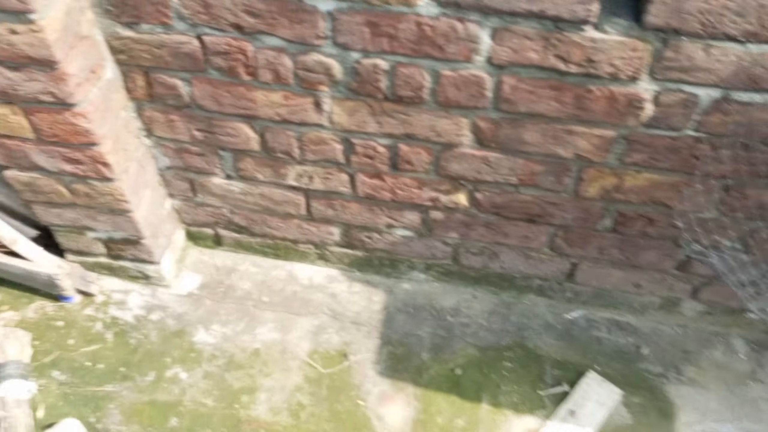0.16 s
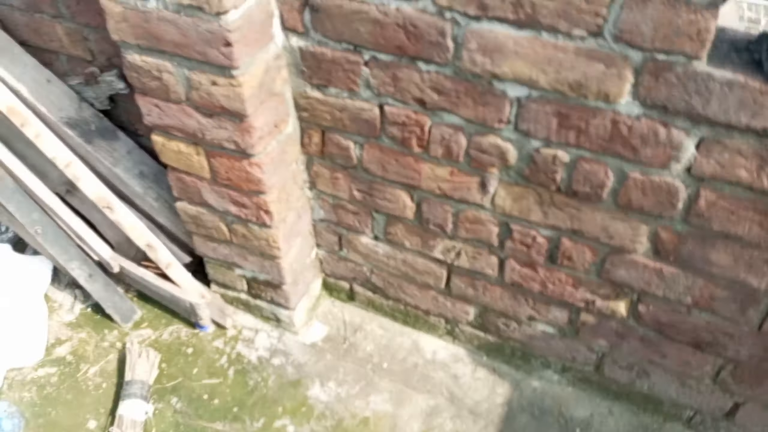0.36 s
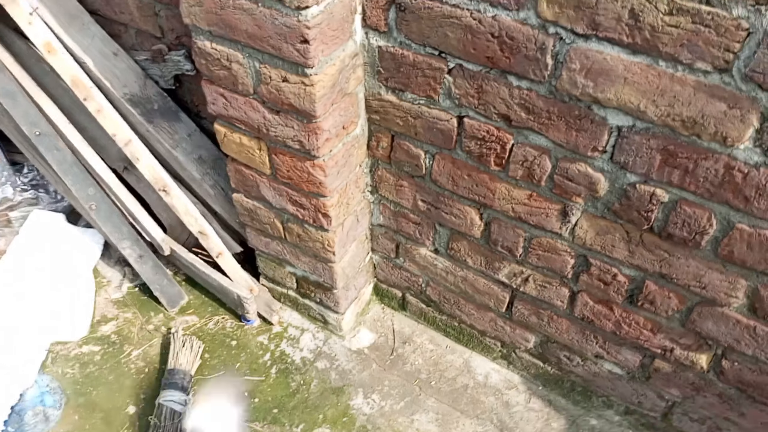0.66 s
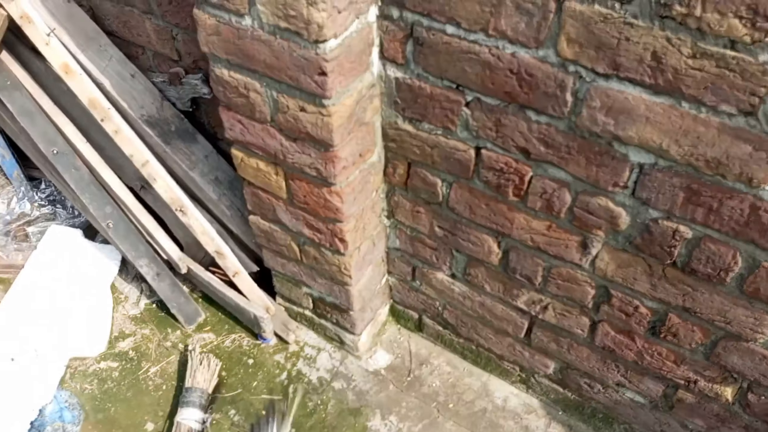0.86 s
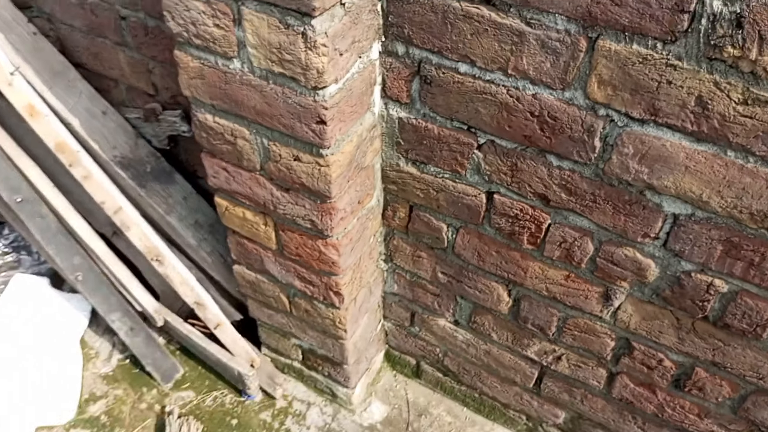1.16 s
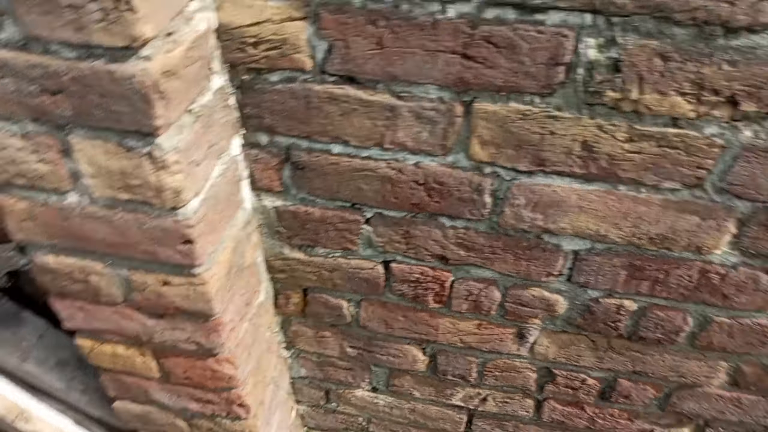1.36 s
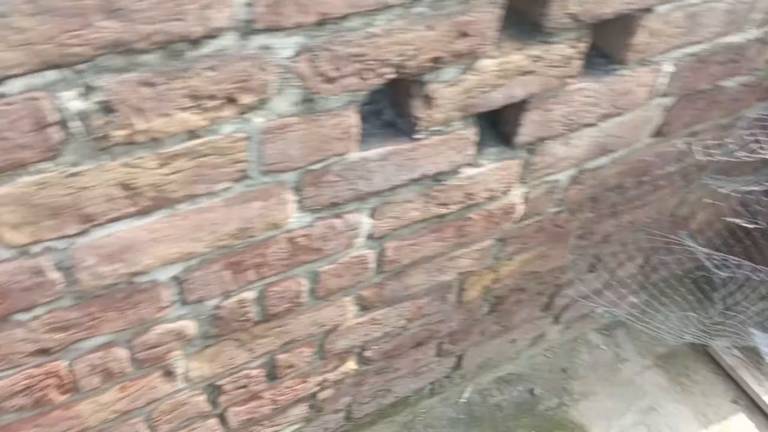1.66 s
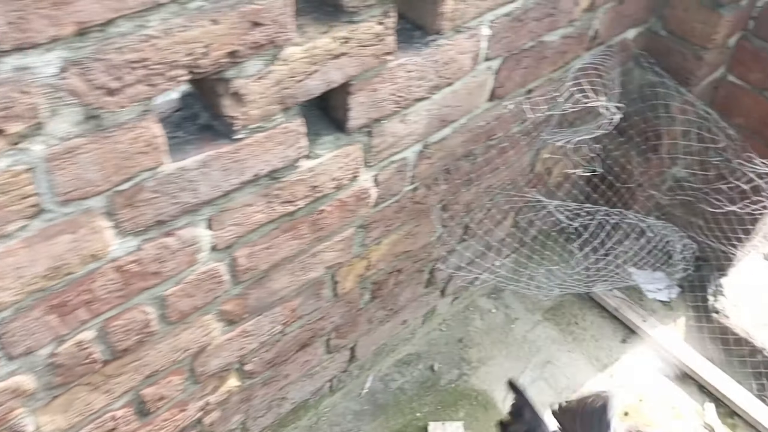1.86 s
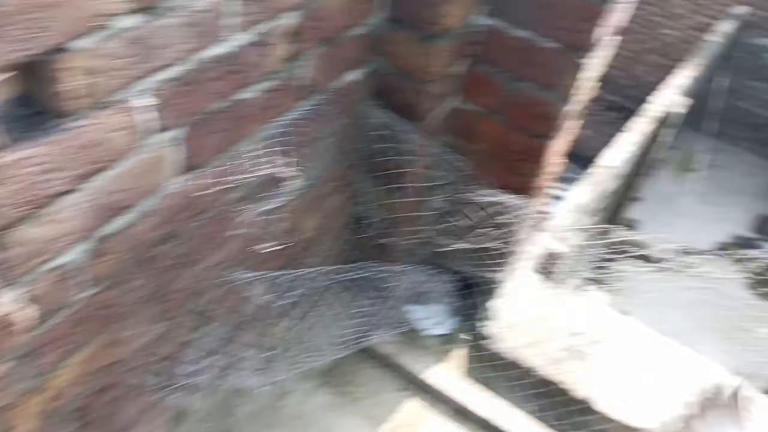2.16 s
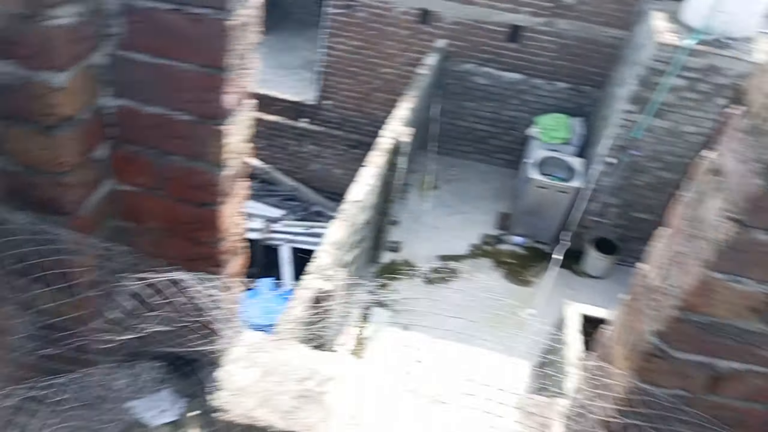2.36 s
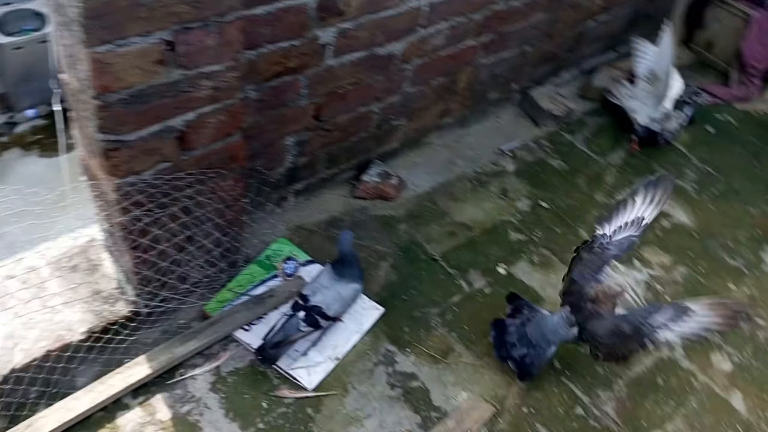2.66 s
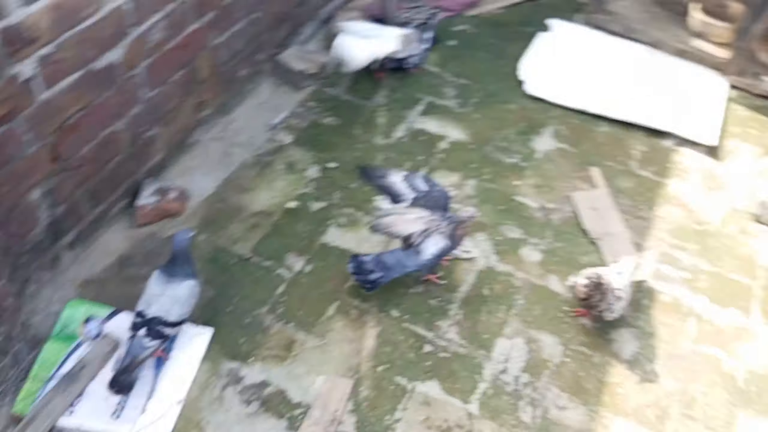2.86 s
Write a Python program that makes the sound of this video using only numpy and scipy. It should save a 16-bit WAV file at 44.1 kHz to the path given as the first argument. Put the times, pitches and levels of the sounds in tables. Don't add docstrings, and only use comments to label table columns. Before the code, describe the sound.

Pigeons scuffle on a walled rooftop: light feather swishes and claw knocks at first, with a heavy low bump near 1.0 s. Raspy two-part sparrow chirrups come at 0.4, 0.9, 1.05, 1.4 and 2.3 s, among thin falling chick peeps. Sharp phone taps click at 1.5 s. Wing slaps and grunting thumps crowd 1.75-2.4 s, then ease over town hum, a distant flock and short brick echo.

```python
import sys
import numpy as np
from scipy import signal
from scipy.io import wavfile
from scipy.ndimage import uniform_filter1d

SR = 44100
rng = np.random.default_rng(int(sys.argv[2]) if len(sys.argv) > 2 else 0)


def file_out(sig):
    cols = np.atleast_2d(sig).T
    lim = np.clip(cols, -1, 1)
    pcm = np.round(lim * 32767).astype(np.int16)
    wavfile.write(sys.argv[1], SR, pcm)


def elevation(decibels):
    levels = np.asarray(decibels, float)
    return 10 ** (levels / 20)


N = 132300
T = np.arange(N) / SR
TIP_HZ, TIP_WIDTH_HZ = 13000, 18000

# frequency in Hz, level in dB per Hz.
TOWN_COLOUR = [(40, -36), (100, -7.5), (300, 1.5), (650, -5), (2500, -4), (4600, -13.5), (6800, -35),
               (8600, -54), (15800, -48.5)]
# time in seconds, level in dB.
FLOCK_STIR = [(0, 1), (.2, -1), (.5, -4.5), (.67, 0), (.85, 4.5), (1.15, -1), (1.26, -5.5), (1.45, -1.5),
              (1.6, -2.5), (1.73, 1), (2.2, 4), (2.55, 2), (2.9, -2.5), (3, -1.5)]
# start in seconds, length in seconds, first pitch in Hz, last pitch in Hz, level in dB.
PEEPS = [(.0, 0.052, 2644, 2207, -54), (0.048, 0.083, 2317, 1985, -55), (.285, 0.1, 3880, 3607, -49.5),
         (2.779, 0.038, 2887, 2660, -50), (0.318, 0.026, 2155, 2040, -51),
         (0.498, 0.037, 3063, 2800, -45.5), (.835, 0.086, 3200, 2364, -56),
         (1.06, 0.027, 2250, 2140, -47.5), (.998, .06, 3410, 3400, -39), (0.319, .03, 4300, 4090, -55.5),
         (1.164, 0.026, 2620, 2470, -38), (1.231, 0.07, 3130, 2850, -56.5),
         (1.298, 0.091, 3248, 2523, -48.5), (1.263, 0.12, 2740, 2125, -55), (1.396, 0.032, 4150, 4010, -48),
         (1.463, 0.066, 3950, 3716, -50), (1.548, 0.045, 3030, 2770, -54.5),
         (1.596, 0.045, 2800, 2650, -49.5), (1.652, .04, 2450, 2250, -47), (2.048, 0.17, 4290, 4090, -54.5),
         (2.203, 0.056, 4100, 2950, -43.5), (2.27, 0.073, 3050, 2780, -58.5),
         (2.262, 0.067, 2600, 2578, -56.5), (2.344, 0.03, 2450, 2180, -49),
         (2.668, 0.13, 3775, 3490, -57.5), (2.718, 0.053, 4380, 3760, -60),
         (2.698, 0.081, 3015, 2245, -53.5), (2.763, 0.042, 3740, 2735, -56.5)]
# start in seconds, level in dB, centre in Hz, length in seconds.
KNOCKS = [(0.093, -51, 2160, 0.0078), (0.236, -43.5, 1970, 0.021), (0.387, -48, 1850, 0.024),
          (0.564, -41, 1710, 0.023), (0.586, -47.5, 937, 0.0088), (.726, -52, 1340, 0.01),
          (0.746, -41, 1540, 0.025), (.933, -43, 1890, 0.018), (1.01, -51, 1260, 0.013),
          (1.013, -45, 2030, 0.004), (1.086, -40, 2228, 0.0078), (1.163, -50.5, 1060, 0.009),
          (1.287, -52.5, 1300, .01), (1.314, -59, 1240, 0.02), (1.419, -48, 2300, 0.019),
          (1.431, -51, 1400, 0.0083), (1.529, -65, 14600, 0.0062), (1.764, -38.5, 1740, 0.0083),
          (1.763, -44, 3960, 0.0056), (1.766, -40.5, 1080, 0.0092), (1.828, -50, 1970, 0.014),
          (1.884, -37.5, 1006, .012), (1.885, -36, 4350, 0.0096), (1.896, -37, 3320, 0.0077),
          (1.916, -39, 2540, .008), (1.929, -40, 3100, 0.013), (1.943, -52, 2710, 0.0066),
          (1.96, -54, 3980, 0.0059), (1.969, -47.5, 1170, 0.007), (2.006, -43, 1660, 0.0075),
          (2.008, -40.5, 3130, 0.0098), (2.022, -63, 2350, 0.0037), (2.037, -65, 2970, 0.0079),
          (2.134, -44, 1790, 0.0075), (2.253, -40.5, 3150, .012), (1.12, -32, 3000, 0.0081),
          (.974, -40, 2650, .012), (2.199, -46, 1190, 0.0042), (2.255, -49, 1130, 0.0089),
          (2.383, -38, 1065, 0.0083), (2.388, -57, 3270, 0.0068), (2.389, -40, 6060, 0.0077),
          (2.413, -47, 1630, 0.013)]
# start in seconds, length in seconds, level in dB, centre in Hz, thin top hiss in dB.
SWISHES = [(0.146, 0.077, -54, 1180, -23), (0.226, 0.041, -45.5, 1850, -38),
           (0.304, 0.054, -54.5, 1580, -41), (0.525, 0.065, -46, 1700, -39), (0.701, 0.07, -46, 1620, -35),
           (0.804, 0.086, -62, 2280, -4), (0.893, 0.13, -56, 1920, -12), (0.999, 0.038, -46, 1426, -17),
           (1.315, 0.021, -49, 1460, -37), (1.414, 0.029, -55, 2050, -2), (1.858, 0.24, -53.5, 2570, 0.5),
           (2.124, 0.023, -52, 1620, -32), (2.226, 0.058, -71, 1540, -20), (2.322, 0.15, -50, 2140, 2),
           (2.412, .11, -52.5, 2050, -13), (1.084, 0.089, -57.5, 2200, -29), (1.5, 0.053, -63, 1500, 2)]
# seconds from start, pitch in Hz, level in dB, rasp 0 to 1.
CHIRRUP_FALL = [(0, 4235, -11.5, .45), (.012, 4150, -7.5, 0.6), (.028, 4150, -4.5, .9),
                (.045, 3650, -11, 0.7), (.056, 3250, 1.5, .3), (.07, 3180, 0.5, .4), (.082, 2600, 8.5, .6)]
# seconds from start, pitch in Hz, level in dB, rasp 0 to 1.
CHIRRUP_HOLD = [(.08, 4068, 10.5, 0.77), (.088, 3680, 3, 0.3), (.102, 3408, 8, 0.38), (.125, 3400, 4, 0.58),
                (.135, 3368, -11, .25), (.165, 3350, -18, .2)]
# start in seconds, level in dB, pitch factor, second part in dB, its lateness in ms.
CHIRRUPS = [
    (0.364, -35.5, 1, -5, 0.17),
    (.903, -38.5, 0.97, -2.5, 8.4),
    (1.052, -37.5, 1.01, -2.5, 2.8),
    (1.39, -40.5, 1.001, -2.5, 1.65),
    (2.329, -36, 1.0, -5, 6.75),
]
# start in seconds, peak in dB, pitch in Hz, length in seconds.
THUMPS = [
    (0.528, -49, 465, 0.017),
    (0.731, -46.5, 399, 0.023),
    (0.976, -30.5, 268.6, 0.022),
    (1.798, -43, 278, 0.02),
    (1.873, -38.5, 317, 0.04),
    (1.919, -42.5, 404, 0.035),
    (1.973, -35.5, 267, 0.01),
    (2.104, -45, 278, 0.02),
    (2.223, -40, 337, 0.017),
    (2.295, -42.5, 603, 0.0043),
]
# start in seconds, length in seconds, level in dB.
GUSTS = [
    (0.768, 0.1, -59),
    (1.364, 0.12, -63),
    (1.521, 0.036, -47.5),
    (1.842, 0.21, -54.5),
    (2.05, 0.313, -57),
    (2.407, 0.041, -59.5),
]
# time in seconds, feather crack in dB, wing in dB over crack,
# tip hiss in dB over crack, time to die by 60 dB in seconds.
SLAPS = [(0.8056, -62.5, 28.5, -23, 0.084), (1.0117, -47.5, 21, -35, 0.042),
         (1.385, -36, -20.5, -44, 0.048), (1.5287, -43.5, 2, -38, 0.14), (1.6177, -43.5, -1.5, -47, 0.048),
         (1.6621, -41, -1, -18.5, 0.066), (1.7655, -53.5, 32, -24, 0.03), (1.8304, -44.5, 11, -16, 0.11),
         (1.886, -29, 7, -16.5, 0.052), (1.8878, -27, 2, -18, .015), (1.92, -41.5, 10, -9, 0.1),
         (1.958, -38, -2, -12, .02), (1.933, -21.5, -4.5, -25, 0.03), (1.977, -45, 2, -26, 0.054),
         (2.0086, -28.5, 5.5, -28, 0.042), (2.1318, -35.5, 1.5, -21, 0.057), (2.255, -44, 19, -12, 0.027),
         (2.294, -53.5, 12, -5, 0.095), (2.388, -29, 2.5, -15, 0.069), (2.7037, -42.5, 3.5, -26, 0.09),
         (2.979, -48, -18, -25, 0.21)]
# time in seconds, peak in dB, push in ms.
TAPS = [
    (1.5322, -18.5, 0.15),
    (1.5354, -29.5, 0.22),
    (1.5413, -25.5, 0.074),
    (1.5467, -33.5, 0.32),
    (1.6075, -32, 0.1),
    (2.297, -28.5, 0.2),
]


def band(x, hz, width_hz):
    low = np.sqrt(hz ** 2 + width_hz ** 2 / 4) - width_hz / 2
    high = min(low + width_hz, .45 * SR)
    return signal.sosfilt(signal.butter(3, [low, high], "band", fs=SR, output="sos"), x)


def unit(x):
    return x / np.sqrt(np.mean(np.abs(x) ** 2))


def walk(rate):
    k = max(int(SR / rate), 1)
    return unit(uniform_filter1d(uniform_filter1d(rng.standard_normal(N), k), k))


def hump(start, length, edge):
    inside = np.minimum(T - start, start + length - T)
    return np.sin(np.pi / 2 * np.clip(inside / edge, 0, 1)) ** 2


def hoarse(hz):
    noise = rng.standard_normal(N) + 1j * rng.standard_normal(N)
    return unit(signal.sosfilt(signal.butter(3, hz, fs=SR, output="sos"), noise))


def whistle(hz, env, flutter, octave_db):
    tone = flutter * np.exp(2j * np.pi * np.cumsum(hz) / SR)
    return env * np.sqrt(2) * np.real(tone + elevation(octave_db) * tone ** 2)


def town():
    level_db, swell_db, flicker_db, treble_stir = -53.5, .4, 2.1, 1.3
    hum = 0
    colour_hz, colour_db = np.array(TOWN_COLOUR).T
    stir = np.interp(T, *np.array(FLOCK_STIR).T) + swell_db * walk(3.2)
    for hz in 36 * 2 ** np.arange(0, 8.9, .3):
        follow = 1 + treble_stir * max(np.log2(hz / 2500), 0)
        db = np.interp(np.log(hz), np.log(colour_hz), colour_db) + stir * follow + flicker_db * walk(5.3)
        hum = hum + elevation(db) * band(rng.standard_normal(N), hz, hz / 4.8)
    return unit(hum) * elevation(level_db)


def chicks():
    rough, bend, octave_db, edge_s = .6, 1.5, -40, .008
    flutter = unit(1 + rough * (walk(150) + 1j * walk(180)))
    out = 0
    for start, length, first_hz, last_hz, db in PEEPS:
        glide = np.clip((T - start) / length, 0, 1) ** bend
        env = elevation(db) * hump(start, length, edge_s)
        out = out + whistle(first_hz + (last_hz - first_hz) * glide, env, flutter, octave_db)
    return out


def knocks():
    q, edge = 3.9, 0.37
    out = np.zeros(N)
    puffs = rng.standard_normal((len(KNOCKS), SR // 16))
    for (start, db, hz, length), noise in zip(KNOCKS, puffs):
        first = int(start * SR)
        at = slice(first, first + len(noise))
        puff = noise * hump(start, length, edge * length)[at]
        out[at] += elevation(db) * band(puff, hz, hz / q) * np.sqrt(SR / 2 * q / hz)
    return out


def swishes():
    riffle_hz, riffle_db, q = 220, 2.5, 0.95
    hiss_db, top_db, push_db = -19.5, -26, -7.5
    quills = np.sin(2 * np.pi * np.cumsum(riffle_hz * (1 + 0.146 * walk(29.2))) / SR)
    air = unit(rng.standard_normal(N) * elevation(riffle_db * (quills + 0.62 * walk(570))))
    hiss = elevation(hiss_db) * unit(band(air, 5300, 1600))
    push = elevation(push_db) * unit(band(air, 337, 580))
    top = unit(band(air, TIP_HZ, TIP_WIDTH_HZ))
    out = 0
    for start, length, db, hz, thin_db in SWISHES:
        swish = unit(band(air, hz, hz / q)) + hiss + elevation(top_db + thin_db) * top + push
        out = out + elevation(db) * hump(start, length, 0.25 * length) * swish
    return out


def sparrows():
    rough, rough_hz, rasp_hz, octave_db, sub_db = .7, 200, 480, -35, -19.5
    flutter = unit(1 + rough * (walk(rough_hz) + 1j * walk(rough_hz)))
    cloud = hoarse(rasp_hz)
    out = 0
    for start, db, pitch, hold_db, late_ms in CHIRRUPS:
        parts = ((CHIRRUP_FALL, 0, start), (CHIRRUP_HOLD, hold_db, start + late_ms / 1000))
        for part, part_db, begin in parts:
            t, part_hz, part_level, part_rasp = np.array(part).T
            u = T - begin
            hz = pitch * np.interp(u, t, part_hz)
            env = elevation(db + part_db + np.interp(u, t, part_level)) * hump(begin + t[0], t[-1] - t[0], .005)
            rasp = np.clip(np.interp(u, t, part_rasp), 0, 1)
            throat = np.sqrt(1 - rasp * rasp) * flutter + rasp * cloud
            out = out + whistle(hz, env, throat, octave_db)
            out = out + whistle(hz / 2, env * rasp ** 2 * elevation(sub_db), cloud, -np.inf)
    return out


def thumps():
    level_db, octave_db, sag, bite, lead_s = 2, -5, 0.15, 0.17, 0.00365
    out = 0
    for start, db, hz, length in THUMPS:
        u = np.clip((T - start + lead_s) / length, 0, 1)
        phase = 2 * np.pi * hz * length * (u + sag * u * (1 - u))
        octave = elevation(octave_db + bite * (db + 26.5)) * np.sin(2 * phase)
        env = elevation(db + level_db) * np.sin(np.pi * u ** 0.46) ** 2
        out = out + env * (np.sin(phase) + octave)
    return out


def gusts():
    rumble = unit(band(rng.standard_normal(N), 137.4, 143))
    return rumble * sum(elevation(db) * hump(start, length, 0.3 * length) for start, length, db in GUSTS)


def slaps():
    attack_s, grain_db, level_db = 0.0032, 1.5, -7.5
    grain = rng.standard_normal(N) * elevation(grain_db * walk(600))
    envs = np.zeros((3, N))
    for time, crack_db, wing_db, tip_db, t60 in SLAPS:
        u = np.maximum(T - time + attack_s, 0)
        levels = elevation(crack_db + level_db + np.array([[0], [wing_db], [tip_db]]))
        envs += levels * np.minimum(u / attack_s, 1) * 1000. ** (-u / t60)
    bands = ((4300, 2040), (1610, 2710), (TIP_HZ, TIP_WIDTH_HZ))
    return sum(band(env * grain, hz, width) * np.sqrt(SR / 2 / width) for env, (hz, width) in zip(envs, bands))


def taps():
    out = 0
    for time, db, push_ms in TAPS:
        u = (T - time) / push_ms * 1000
        dip = np.exp(-u ** 2)
        rebound = 0.6 * np.exp(-((u - 2.4) / 2.3) ** 2)
        out = out + elevation(db) * (rebound - dip)
    return out


def wall_echo(birds):
    level_db, t60_s, top_hz, gap_s = -9, 0.13, 5500, .004
    t = T[:SR // 2]
    tail = rng.standard_normal(SR // 2) * 1000. ** (-t / t60_s) * (t > gap_s)
    tail = signal.sosfilt(signal.butter(1, top_hz, fs=SR, output="sos"), tail)
    return elevation(level_db) * signal.fftconvolve(birds, tail / np.sqrt(np.sum(tail ** 2)))[:N]


def scene():
    birds = chicks() + knocks() + swishes() + sparrows() + slaps()
    return (birds + wall_echo(birds) + town() + thumps() + gusts() + taps())[None]


def low_pass(x):
    return signal.sosfilt(signal.butter(12, 16170, fs=SR, output="sos"), x)


def record(dry):
    x = signal.sosfilt(signal.ellip(10, .2, 70, 15900, fs=SR, output="sos"), dry)
    mix = signal.sosfilt(signal.butter(2, 45, "high", fs=SR, output="sos"), x)
    return low_pass(mix)


dry = scene()
out = record(dry)
file_out(out)
```